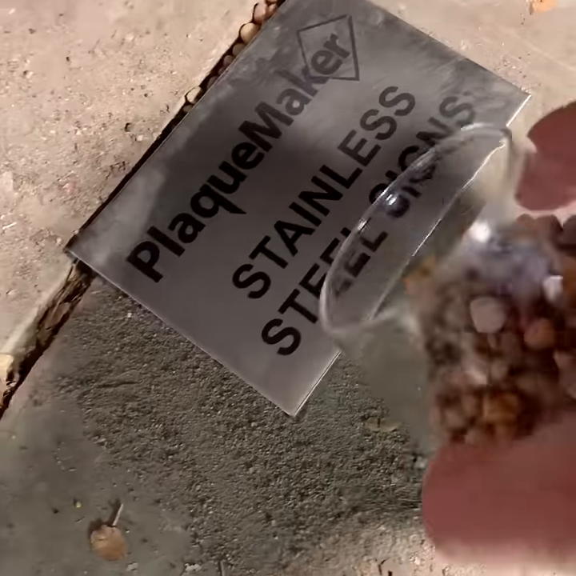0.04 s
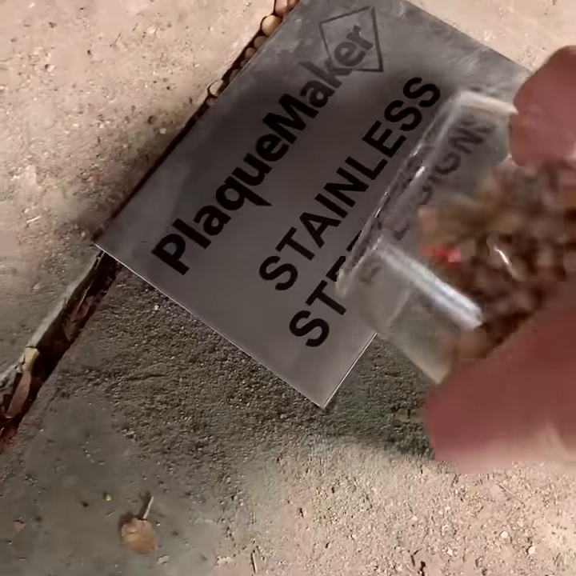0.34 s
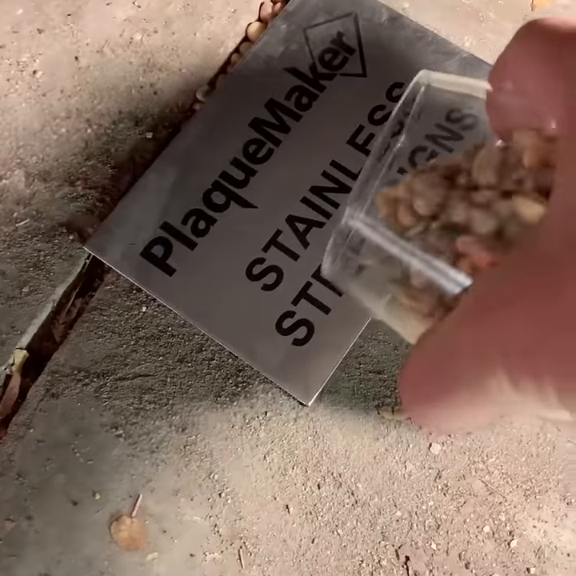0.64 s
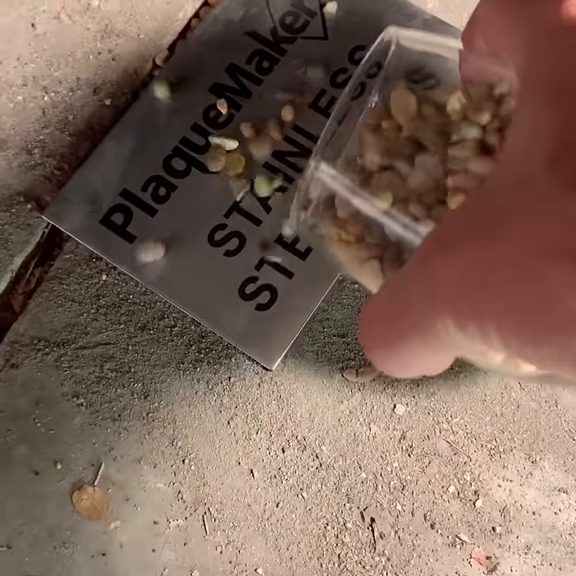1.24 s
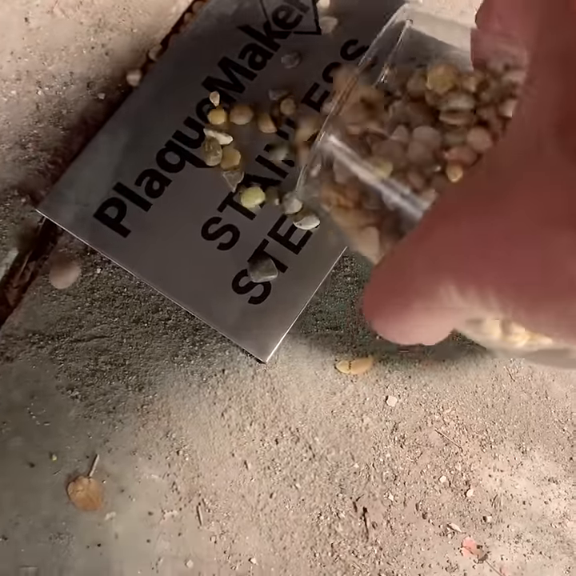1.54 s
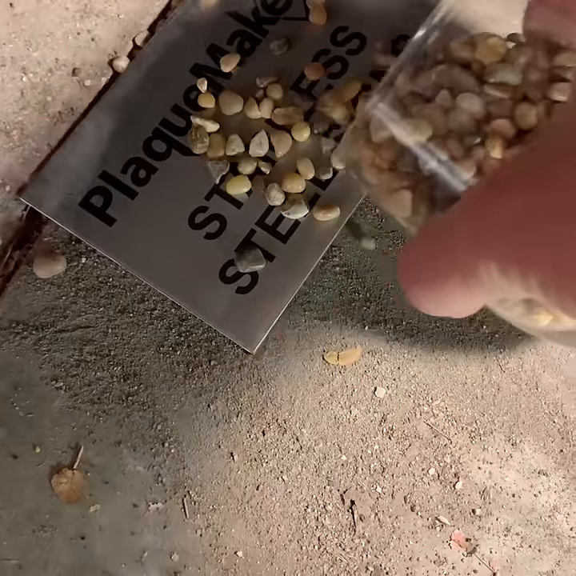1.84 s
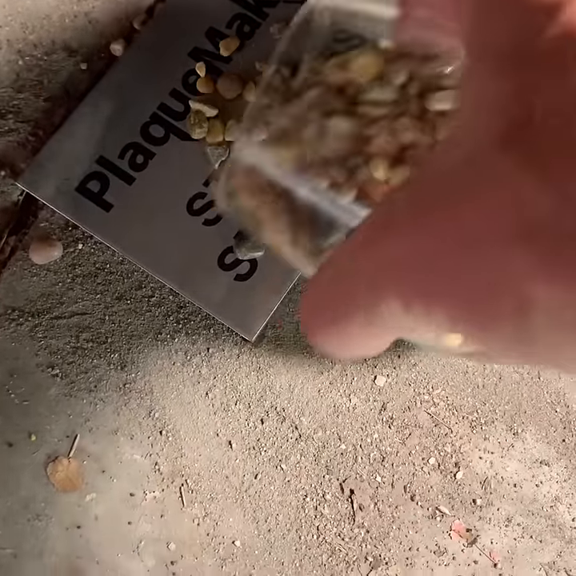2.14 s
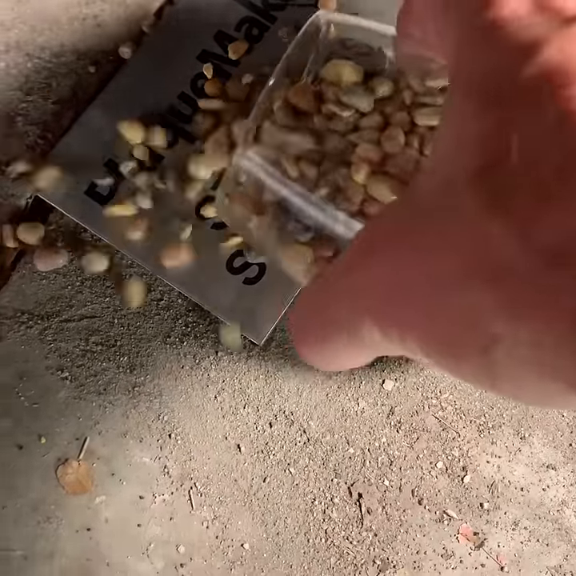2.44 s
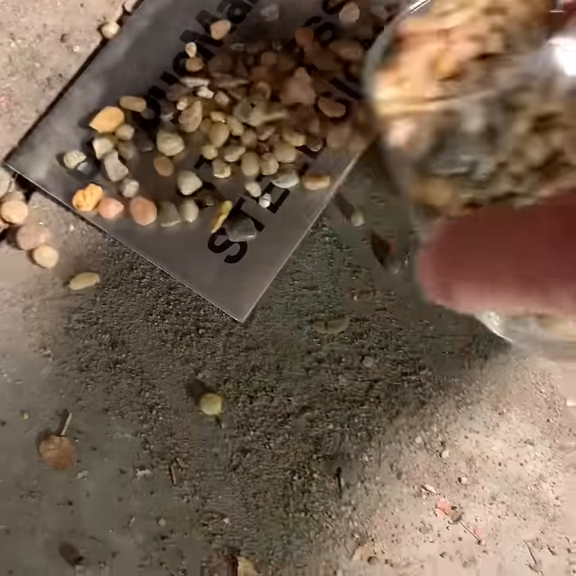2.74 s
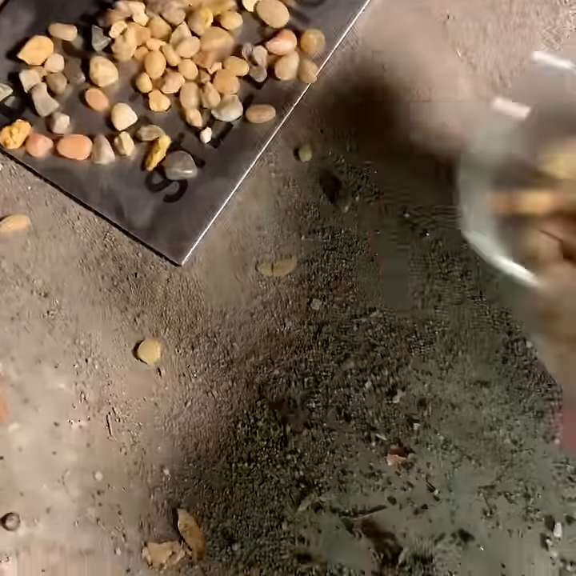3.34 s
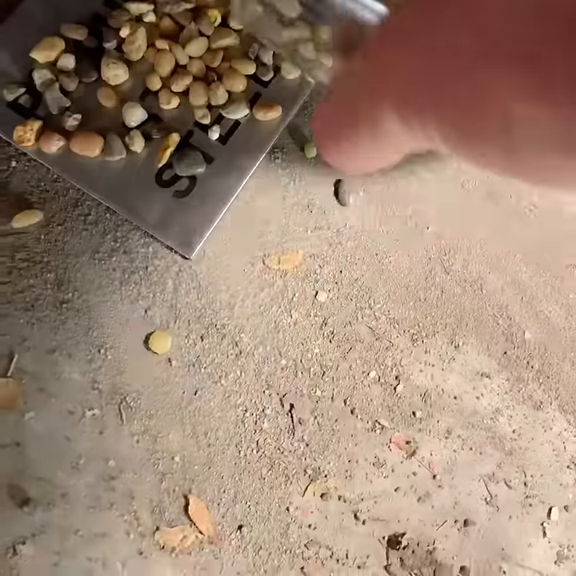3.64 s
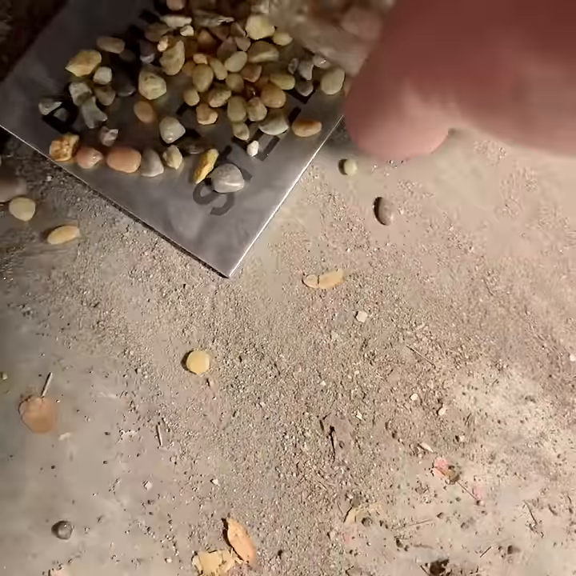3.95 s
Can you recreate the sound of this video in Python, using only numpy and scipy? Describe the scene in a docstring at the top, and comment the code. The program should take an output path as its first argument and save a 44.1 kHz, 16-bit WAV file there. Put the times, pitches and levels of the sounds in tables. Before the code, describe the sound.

Pebbles rattle in a plastic cup and pour onto a steel sheet with ringing clinks.

```python
"""Pea gravel poured on a steel sign

Pebbles click in a shaken plastic cup, then are tipped in three pours onto a thin steel sign lying
on concrete. They bounce and make it ring with many high tones (its modes). The cup is drawn away,
the pebbles settle, and it comes back. Two close microphones hear this outdoors, with a low rumble
and a far hiss."""
import sys
import numpy as np
from scipy import signal
from scipy.fft import rfft, irfft
from scipy.io import wavfile

SR = 44100
rng = np.random.default_rng(int(sys.argv[2]) if len(sys.argv) > 2 else 0)


def store_wav(level_fs):
    """Save 16-bit WAV to argv[1]."""
    pcm = np.round(np.clip(np.atleast_2d(level_fs), -1, 1) * 32767)
    wavfile.write(sys.argv[1], SR, pcm.T.astype(np.int16))


N = 176400
TIME = np.arange(N) / SR
FREQS = np.maximum(np.arange(N // 2 + 1) * SR / N, 1)

# pebbles land on the sign: (time [s], level [dB], high tones against low ones [dB])
LANDING_HITS = [(1.002, -12.5, 1), (1.017, -11, -3), (1.046, -18, -1), (1.065, -18, 4), (1.088, -9.5, 0),
                (1.134, -17.5, 4.5), (1.165, -13.5, 1), (1.207, -26.5, -6), (1.254, -30, -3),
                (1.273, -22, 0.5), (1.359, -19.5, 3.5), (1.491, -21.5, 2), (1.623, -13.5, 3),
                (1.684, -28, 2), (1.704, -19, 5), (1.745, -17.5, 1), (1.892, -25.5, 4), (1.949, -26, 3.5),
                (2.293, -21, 3), (2.313, -9, 5), (2.362, -17.5, 1), (2.372, -19.5, -10), (2.417, -19.5, 7),
                (2.427, -16, -2), (2.438, -14.5, 6), (2.445, -20, -5), (2.5, -25.5, 1), (2.518, -21.5, 2),
                (2.587, -22, 6), (2.659, -23.5, 3.5), (2.703, -24.5, 6), (2.757, -25, 6),
                (2.77, -10.5, 4.5), (2.782, -23, 7), (2.8245, -15.5, 3.5), (2.893, -19.5, 3),
                (2.966, -22.5, 13)]
# how strong the small bounces are, one curve per pour: (time [s], level [dB])
BOUNCE_LEVELS = [
    [(1.01, -24), (1.13, -23.5), (1.3, -34.5), (1.55, -42.5)],
    [(1.63, -24), (1.74, -26), (1.8, -32.5)],
    [(2.3, -28.5), (2.44, -25.5), (2.55, -28.5), (2.63, -42), (2.8, -32.5)],
]
# the sign's tones: (pitch [Hz], level if hit near the middle [dB], level if hit nearer the edge [dB])
SIGN_TONES = [(1750, -16, -12), (1860, -15, -11), (1985, -13, -12), (3090, -15, -10), (3822, -19, -22),
              (4089, -9, -7), (4514, -10, -6), (4580, -19, -15), (5595, -7, -9), (6205, -15, -14),
              (6772, -18, -16), (7080, -16, -25), (7192, -8, -23), (8017, -13, -7), (8322, -24, -13),
              (8796, -19, -18), (9087, -14, -15), (9192, -16, -12), (9444, -11, -12), (9743, -5, -13),
              (10929, -15, -6), (11615, -8, -7), (11735, -9, -4), (12683, -16, -12), (13035, -2, -5),
              (13555, -15, -11), (14331, -13, -13), (14680, -1, -1), (15119, -12, -7), (15557, -11, -13),
              (15627, 0, -2)]
SIGN_T60_S, PIVOT_HZ = 0.14, 11600   # a t60 is the time to fade by 60 dB, here at the pivot pitch
SIGN_RISE_S = 0.0003   # the ring builds up as waves spread over the sheet
SIGN_DB, SIGN_SPREAD_DB = 3.5, 5
EDGE_FROM_S = 2.2   # the last pour falls nearer the edge


def steel_sign():
    """Each pebble ticks, makes loose grit buzz and shares its energy among the sheet's tones."""
    bounces = np.vstack([patter(pour, per_s=130) for pour in BOUNCE_LEVELS])
    bounces = np.column_stack([bounces, np.zeros(len(bounces))])   # neither bright nor dull
    times, db, bright_db = np.vstack([LANDING_HITS, bounces]).T
    pitches, middle_db, edge_db = np.transpose(SIGN_TONES)
    place_db = np.where(times[:, None] > EDGE_FROM_S, edge_db, middle_db)
    tilt = np.tanh((pitches - PIVOT_HZ) / 1000) / 2   # bright hits favour tones above the pivot
    shares = strengths(place_db + np.outer(bright_db, tilt), SIGN_SPREAD_DB)
    sizes = shares.T / np.linalg.norm(shares, axis=1) * from_db(db + SIGN_DB)
    tick = crack(times, db - 2, t60=0.005)
    grit = crack(times, db - 29.5, t60=0.059)
    sound = tick + grit
    for hz, size in zip(pitches, sizes):
        t60 = SIGN_T60_S * (hz / PIVOT_HZ) ** 0.32   # the concrete stops low tones soonest
        sound += ring(times, size, hz, t60, SIGN_RISE_S)
        # pebbles lying on the sheet add a weaker, brief tone just below and just above
        for side in (-1, 1):
            split_size = size * strengths(np.full(len(times), -11.5), SIGN_SPREAD_DB)
            split_hz = hz * (1 + side * 0.0084 * (.5 + rng.random()))
            sound += ring(times, split_size, split_hz, t60=0.064, rise_s=SIGN_RISE_S)
    return sound


# pebbles knock in the cup: (time [s], level [dB])
KNOCKS = [(.1125, -14), (.1635, -16), (.247, -28), (.27, -21.5), (.39, -28), (.428, -12), (.4385, -14),
          (.4443, -6.5), (.473, -2), (.487, -17), (.502, -15), (.5225, -2), (.543, -13.5), (.635, -18),
          (.708, -22), (.72, -12), (.758, -11.5), (.777, -13.5), (.929, -25.5), (.935, -20.5), (1.037, -24),
          (1.597, -24), (2.251, -25), (3.56, -26), (3.641, -23.5), (3.703, -21), (3.742, -20.5),
          (3.777, -11), (3.7825, -13.5), (3.858, -17.5), (3.874, -17), (3.887, -23), (3.938, -20),
          (3.959, -15.5)]
# how strong the small touches between pebbles are: (time [s], level [dB])
STIR_LEVEL = [(0, -21.5), (.25, -40), (.4, -21.5), (.5, -18), (.64, -33), (.8, -24), (1.0, -28), (1.4, -38),
              (2.2, -45.5), (2.3, -19), (2.5, -30), (3.3, -41), (3.72, -45), (3.85, -25.5), (4, -28)]
# tones of the cup and its pebbles: (pitch [Hz], level [dB], t60 [s])
CUP_TONES = [(3194, -7, 0.049), (5910, 3, 0.018), (6730, -19, 0.008), (8100, -9, 0.026), (9720, -7, 0.028),
             (11520, 9, 0.0067)]


def shaken_cup():
    """Every knock or small touch gives a stony crack and a short ring of the cup."""
    times, db = np.vstack([KNOCKS, patter(STIR_LEVEL, per_s=70)]).T
    return cup_ring(times, db - 15, CUP_TONES) + crack(times, db - 3.5)


# pebbles settle as the cup is drawn away and turned upright: (time [s], level [dB])
SETTLING_CLICKS = [(3.046, -29), (3.066, -27.5), (3.087, -25.5), (3.105, -24), (3.127, -27.5), (3.149, -31),
                   (3.212, -36), (3.237, -36.5)]
# the thinner tones of the upright cup: (pitch [Hz], level [dB], t60 [s])
UPRIGHT_TONES = [(9640, -10, 0.012), (14100, -4, 0.014), (14600, -5.5, 0.014)]


def settling_pebbles():
    """Pebbles slide back to the bottom of the cup with thin clicks."""
    times, db = np.transpose(SETTLING_CLICKS)
    return cup_ring(times, db + 7.5, UPRIGHT_TONES) + crack(times, db - 5)


def cup_ring(times, db, tones):
    """Each hit rings all the cup's tones, in a different mix every time."""
    return sum(ring(times, strengths(db + tone_db, spread_db=9.5), hz, t60)
               for hz, tone_db, t60 in tones)


# the colour of stone hitting stone: (frequency [Hz], relative level [dB])
CRACK_COLOUR = [(400, -69), (1500, -9), (3200, -14), (4900, -9.5), (6000, 15.5), (7000, -7.5), (8800, 14),
                (10600, 6.5), (11700, 1), (13000, 0), (15000, 13), (16500, -66)]


def crack(times, db, t60=0.016):
    """Each touch of a stone starts a burst of noise that dies away."""
    energy_kept = from_db(-120 / (t60 * SR))   # from one sample to the next
    energy = signal.lfilter([1], [1, -energy_kept], clicks(times, from_db(db) ** 2))
    return np.sqrt(energy) * noise(CRACK_COLOUR)


# how far the right microphone lags behind the left: (frequency [Hz], phase lag [rad])
RIGHT_LAG = [(0, 0), (1000, 2.2), (1800, 1.8), (2700, 3), (3700, 2.6), (4100, .8), (5000, 3), (7500, 5.9),
             (8800, 6.4), (12500, 9.5), (16500, 12.6)]


def microphone_pair(stones):
    """The sound of the stones reaches the left microphone first."""
    right = irfft(rfft(stones) * np.exp(-1j * curve(RIGHT_LAG, FREQS)), N)
    return np.array([stones, right])


def echoes(stones, level_db=-14, t60=0.35, delay_s=0.0016):
    """Sound bounces off the ground, the hand and things nearby, differently for each microphone."""
    t = TIME[:SR // 4]
    spray = rng.standard_normal((2, len(t))) * from_db(-60 * t / t60) * (t > delay_s)
    spray /= np.linalg.norm(spray, axis=1, keepdims=True)
    return from_db(level_db) * signal.fftconvolve(stones[None], spray, axes=1)[:, :N]


# the colour of the outdoor background: (frequency [Hz], relative level [dB])
AIR_COLOUR = [(20, -47), (38, -17), (58, -5), (115, 0.5), (170, -6), (250, -11), (450, -11.5),
              (1000, -12.5), (1600, -9), (2600, -16.5), (4500, -25), (9000, -23.5), (15500, -38.5),
              (16300, -55)]
# how alike its left and right sides are: (frequency [Hz], likeness [-1 to 1])
SIDE_LIKENESS = [(100, 1), (330, 0.6), (600, 0.25), (1200, -0.38), (2000, -0.38), (3100, -0.061),
                 (6000, -0.19)]
# how the rumble rises and falls: (time [s], level [dB])
RUMBLE_CURVE = [(0, -38), (.12, -31.5), (.47, -31), (.6, -38), (.73, -31.5), (1.0, -31.5), (1.1, -41),
                (1.35, -42.5), (1.55, -35), (2.9, -41), (3.35, -36), (4, -37.5)]
# how the hiss rises and falls: (time [s], level [dB])
HISS_CURVE = [(0, -49.5), (.12, -39.5), (.45, -39), (.58, -44), (.74, -39), (1.0, -38.5), (1.1, -46),
              (1.35, -50.5), (1.55, -42.5), (2.1, -46.5), (2.9, -47), (3.35, -45), (4, -45)]
RUMBLE_DB, HISS_DB, RUMBLE_TOP_HZ, AIR_PAN_DB = 5.5, 7.5, 240, 1.63


def outdoors():
    """A low rumble, alike on both sides and a little to the right, under a wide far hiss."""
    alike = at_hz(SIDE_LIKENESS)
    sides = np.array([[-1], [1]])   # left, right
    shared = np.sqrt((1 + alike) / 2) * rfft(noise(AIR_COLOUR))
    opposed = np.sqrt((1 - alike) / 2) * rfft(noise(AIR_COLOUR))
    air = (shared + sides * opposed) * from_db(sides * AIR_PAN_DB * np.maximum(alike, 0))
    low = 1 / (1 + (FREQS / RUMBLE_TOP_HZ) ** 4)
    rumble = irfft(air * low, N) * from_db(RUMBLE_DB + curve(RUMBLE_CURVE, TIME))
    hiss = irfft(air * (1 - low), N) * from_db(HISS_DB + curve(HISS_CURVE, TIME))
    return rumble + hiss


def patter(level, per_s):
    """Small hits at random moments, following a level curve: rows of (time [s], level [dB])."""
    start, end = level[0][0], level[-1][0]
    times = TIME[(rng.random(N) < per_s / SR) & (TIME > start) & (TIME < end)]
    softness = rng.standard_normal(N)[(times * SR).astype(int)]
    return np.column_stack([times, curve(level, times) - 1.5 * np.minimum(softness, 2)])


def strengths(db, spread_db):
    """How hard, and which way, a tone is pushed depends on where a pebble hits: left to chance."""
    draw = rng.standard_normal(np.shape(db) + (2,))
    return from_db(db + spread_db * np.clip(draw[..., 0], -2, 1)) * np.sign(draw[..., 1])


def ring(times, sizes, hz, t60, rise_s=0):
    """One tone, struck at the given times; with a rise time it swells before it fades."""
    hits = clicks(times, sizes)
    step = 2 * np.pi * hz / SR

    def sine(kept):
        """A sine wave that keeps this share of its size from sample to sample."""
        return signal.lfilter([0, np.sin(step)], [1, -2 * kept * np.cos(step), kept * kept], hits)

    tone = sine(from_db(-60 / (t60 * SR)))
    return tone - sine(np.exp(-1 / (rise_s * SR))) if rise_s else tone


def clicks(times, sizes):
    """A one-sample spike at each time."""
    return np.bincount(np.clip((times * SR).astype(int), 0, N - 1), sizes, N) + 1e-18


def noise(colour):
    """Noise of the given colour, with a typical size (rms) of 1."""
    x = irfft(rfft(rng.standard_normal(N)) * from_db(at_hz(colour)), N)
    return x / x.std()


def at_hz(points):
    """Read a table at every frequency, giving each octave equal room."""
    hz, value = np.transpose(points)
    return np.interp(np.log(FREQS), np.log(hz), value)


def curve(rows, at):
    """Join a table's points with straight lines and read off the values."""
    return np.interp(at, *np.transpose(rows))


def from_db(db):
    """Turn decibels into a multiplier."""
    return 10 ** (np.asarray(db) / 20)


def scene():
    """The stones at both microphones, their echoes and the background."""
    stones = shaken_cup() + settling_pebbles() + steel_sign()
    return microphone_pair(stones) + echoes(stones) + outdoors()


def record(dry, cutoff_hz=17100):
    """Loud peaks are rounded off and the highest treble is cut."""
    rounded = .9 * np.tanh(dry / .9)
    return signal.sosfilt(signal.cheby2(16, 60, cutoff_hz, fs=SR, output="sos"), rounded)


dry = scene()
out = record(dry)
store_wav(out)
```